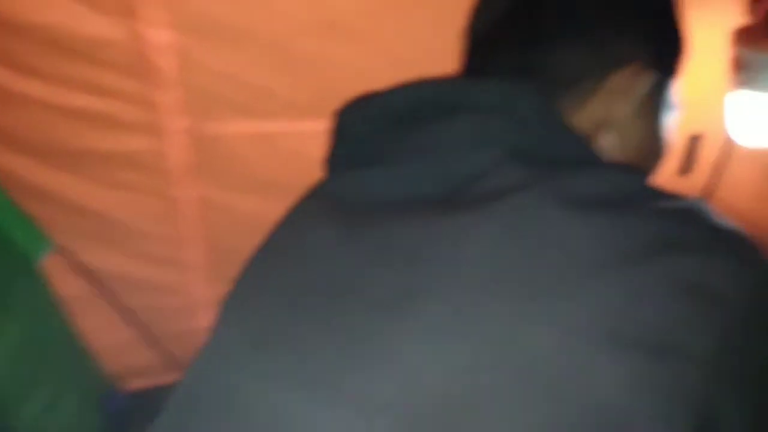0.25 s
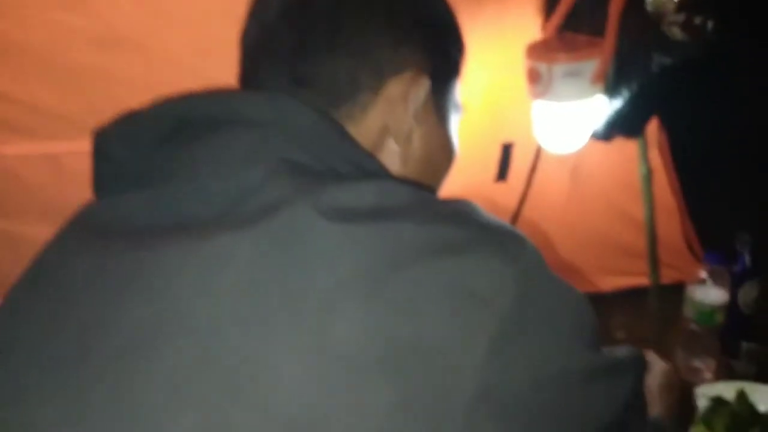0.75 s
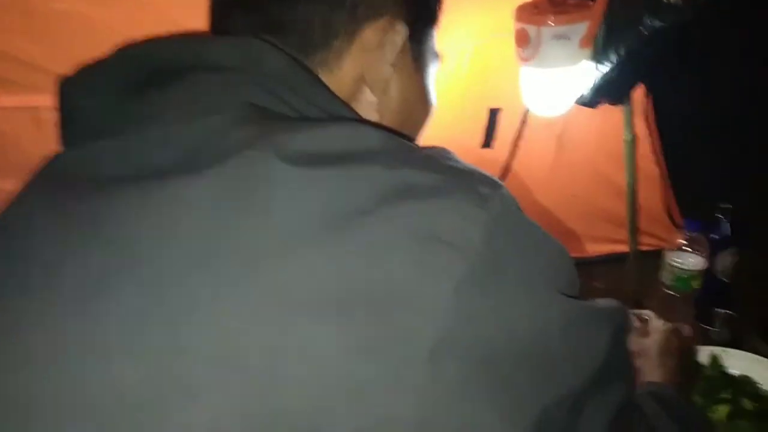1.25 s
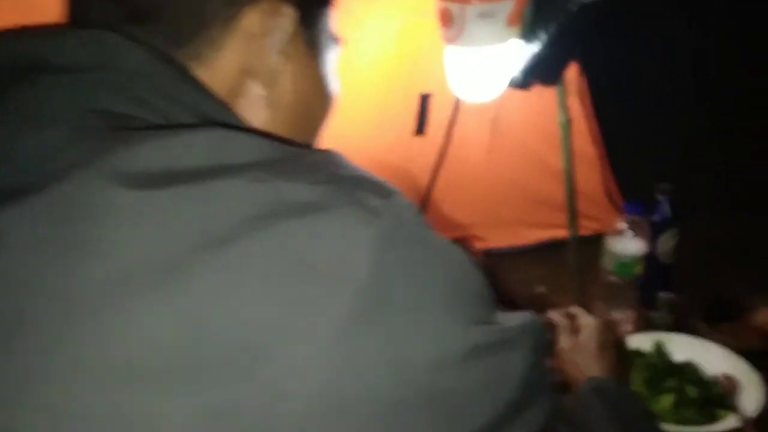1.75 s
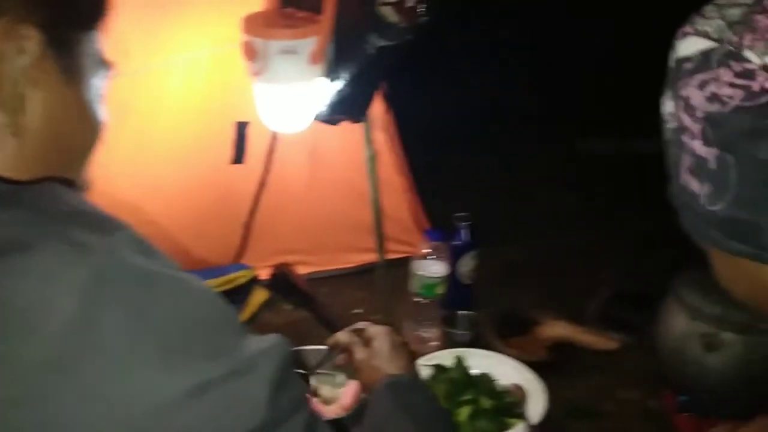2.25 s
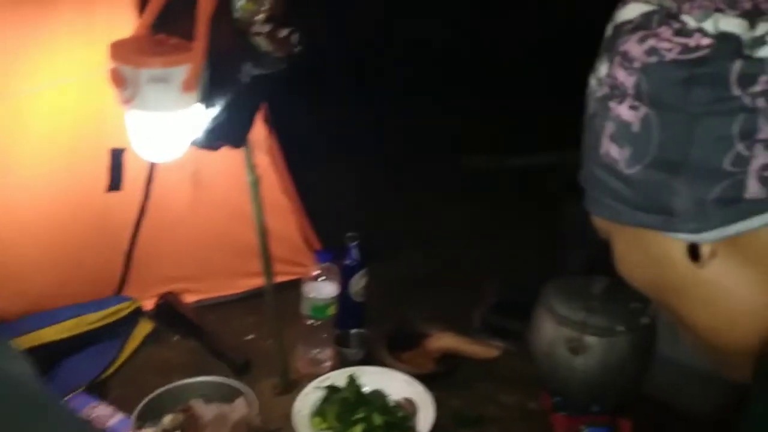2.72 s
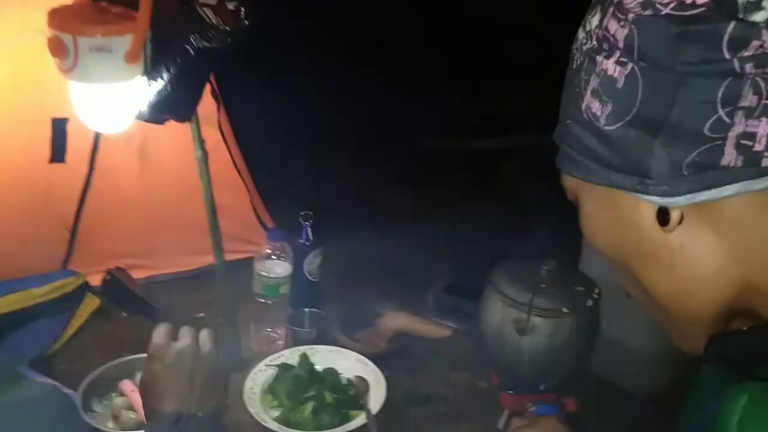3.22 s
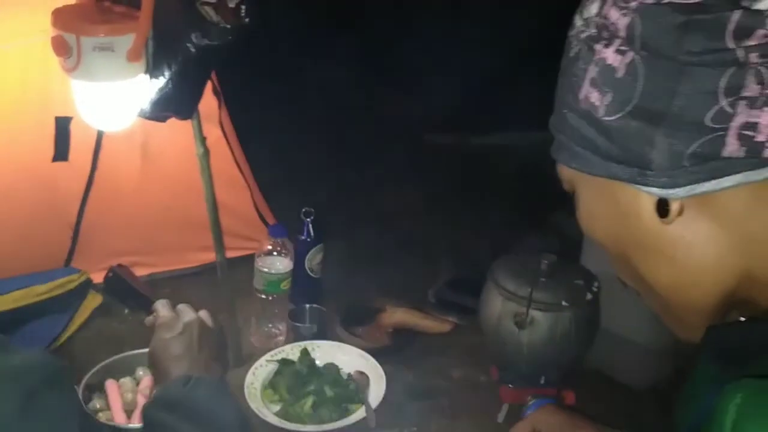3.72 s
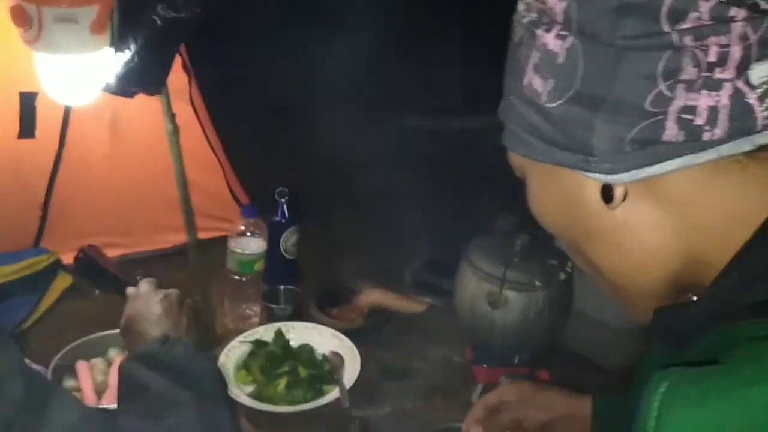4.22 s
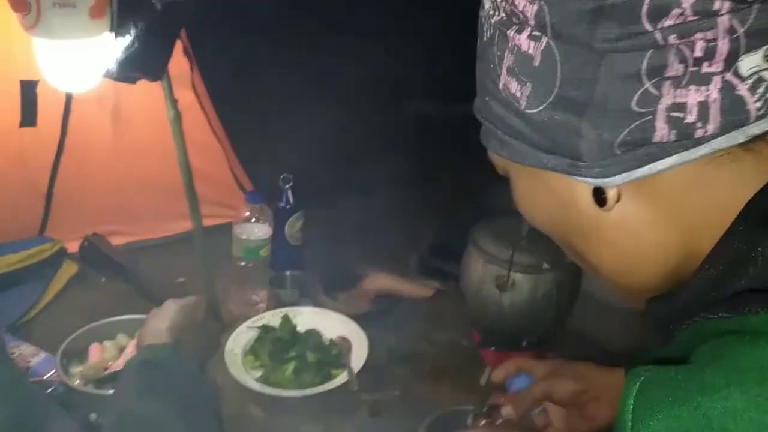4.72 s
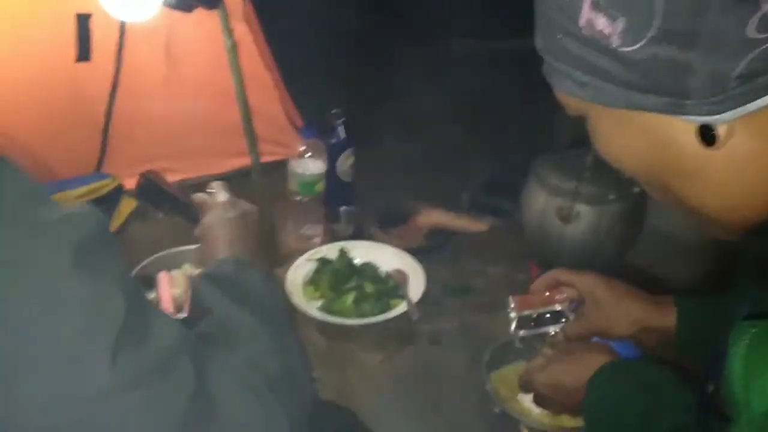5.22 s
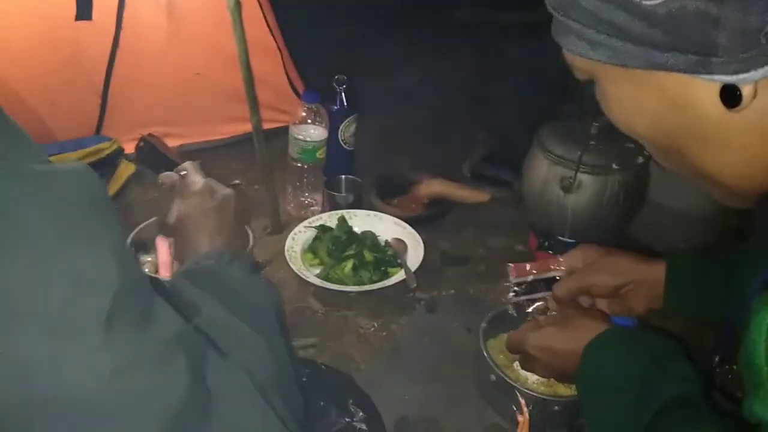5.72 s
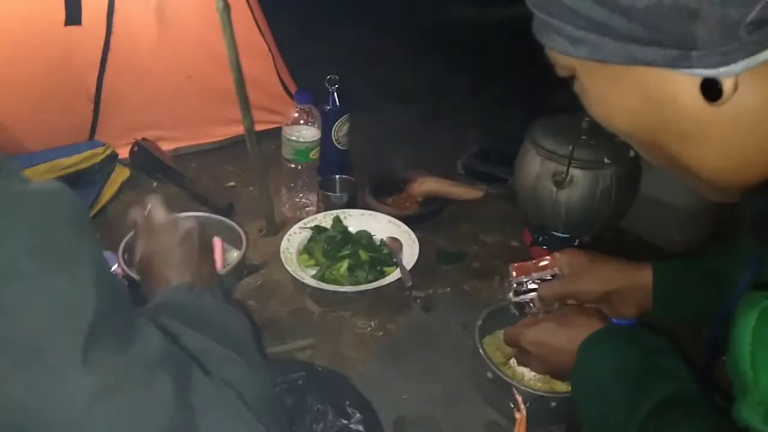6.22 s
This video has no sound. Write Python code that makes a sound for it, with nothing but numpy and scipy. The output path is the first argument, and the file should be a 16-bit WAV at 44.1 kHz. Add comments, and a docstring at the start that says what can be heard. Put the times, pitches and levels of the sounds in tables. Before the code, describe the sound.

A gas burner hisses softly and steadily at a quiet outdoor camp, with a low flame murmur underneath. Close by, jacket sleeves rustle and a sachet crinkles with small sharp crackles throughout, easing a little after about 4.5 seconds. A spoon clicks and scrapes in a filled metal bowl right at the start and again around 0.7 seconds. It gives a sharp clink with a hollow knock at 1.4, lighter taps and a scrape around 2, a strong clink among scrapes near 2.8, and a briefly ringing one at 3.3. Short, slightly squeaky scrapes follow from 4 to 4.3 seconds. A few dull bumps sound on the ground from about 4.3, and a tin is knocked once at 5.3. After a faint scrape near 5.9, three quick spoon clinks come at about 6.3 seconds. Everything sounds near and fairly dry.

```python
"""A spoon clicks, scrapes and digs in a metal bowl at a quiet camp, beside a hissing gas burner.
Impacts and stick-slip friction excite the bowl's modes and its hollow; the turbulent gas jet hisses
and the flame murmurs under a pot. Jacket sleeves and a sachet crinkle as they buckle. Late on, a few
dull bumps sound on the ground and a tin is knocked once. Ground, pot and tent return close echoes
of the spoon and the crinkling to a microphone with two ports."""
import sys
import numpy as np
from scipy import signal
from scipy.fft import rfft, irfft, next_fast_len
from scipy.io import wavfile
from scipy.ndimage import uniform_filter1d, map_coordinates

SR = 44100
rng = np.random.default_rng(int(sys.argv[2]) if len(sys.argv) > 2 else 0)


def wav_out(sig):
    """Save sig, one row per channel (or a flat mono array), as 16-bit PCM at SR to the path in sys.argv[1]."""
    wavfile.write(sys.argv[1], SR, np.round(np.clip(np.atleast_2d(sig).T, -1, 1) * 32767).astype(np.int16))


N = 285327
T = np.arange(N) / SR

# All levels in the tables are relative.
# burner hiss and low flame murmur, with a gap near 1.3-2.5 kHz from the recorder's processing:
# f/Hz, level/dB
HISS_SPECTRUM = [(900, -14.5), (1300, -21), (1650, -30), (2150, -24), (2750, -4.5), (3200, -9.5),
                 (3900, 2.5), (4400, -2), (6000, 0), (8000, -1.5), (9500, 0), (12000, -6.5), (15500, -8)]
MURMUR_SPECTRUM = [(20, -27), (45, -18), (70, -6.5), (110, 1.5), (160, 1.5), (210, -1.5), (280, -9),
                   (450, -11), (800, -13), (1100, -14), (1350, -25), (1650, -39), (4000, -26)]
# rumble of moving air: f/Hz, level/dB
AIR_SPECTRUM = [(20, -10), (45, -7.5), (70, -3), (100, -14), (180, -27), (600, -24.5)]
# resonances of the burner head: f/Hz, bandwidth/Hz, level/dB
BURNER_RESONANCES = [(3570, 130, 12), (3930, 110, 12)]
# strength of the flame: t/s, level/dB
FLAME_LEVELS = [(0, -45.5), (2, -44.5), (3.5, -45.5), (5.5, -45), (6.0, -44.5), (6.47, -43.5)]
# movement of sleeves and sachet: t/s, fine rustle level/dB, heavy fold level/dB
RUSTLE_LEVELS = [(0, -36, -51), (.27, -30.5, -46.5), (.37, -24, -48), (.5, -28.5, -48), (.77, -24.5, -45),
                 (1.15, -31, -51), (1.33, -28, -45.5), (1.53, -22.5, -38), (1.65, -26.5, -43),
                 (1.88, -30, -55), (2.06, -24.5, -39), (2.27, -30, -50.5), (2.62, -25.5, -46),
                 (2.8, -25.5, -45.5), (3.03, -30.5, -58), (3.2, -27.5, -47.5), (3.45, -25, -42.5),
                 (3.88, -27.5, -45.5), (4.38, -24.5, -43), (4.5, -28.5, -57), (4.85, -30, -53),
                 (5.1, -34, -63), (5.3, -32.5, -51), (5.78, -32.5, -61), (5.96, -29.5, -57),
                 (6.21, -29.5, -55), (6.47, -30, -44)]
# spectra of the fine rustle and the heavy folds: f/Hz, level/dB
FABRIC_SPECTRUM = [(300, -41), (1600, -18.5), (2200, -12.5), (3200, -4), (4800, -3), (7000, -1.5),
                   (9000, 0), (10500, -3.5), (12500, -8), (15500, -10.5)]
FOLD_SPECTRUM = [(150, -62), (450, -5), (700, -5.5), (1050, 0.5), (1500, -4.5), (2600, -1), (4500, -32),
                 (9000, -35)]
# spoon impacts: t/s, tick level/dB, tick f/Hz, ring level/dB, knock level/dB, knock f/Hz, tick t60/s
SPOON_IMPACTS = [(.072, -17.5, 7400, -31, -32.5, 1060, .056), (.642, -17.5, 3900, -25.5, -34, 1050, .03),
                 (.686, -29, 3600, -39, -33.5, 990, .045), (.874, -25, 3400, -37, -27, 980, .035),
                 (0.995, -34, 5000, -39, -36.5, 1100, .06), (1.356, -7, 5000, -28, -21.5, 1130, .056),
                 (1.389, -16.5, 7000, -44, -39, 1040, .05), (1.393, -27, 1600, -47, -26, 1100, .04),
                 (1.620, -36, 5000, -50, -31.5, 900, .045), (1.940, -17, 11000, -38, -43, 864, .05),
                 (1.9445, -22, 2600, -34, -22.5, 860, .032), (2.016, -25, 3900, -40, -37, 1000, .035),
                 (2.073, -21, 3900, -37, -28.5, 920, .045), (2.175, -25, 5800, -44, -37, 900, .035),
                 (2.661, -26, 3600, -38, -29, 1180, .045), (2.761, -4, 5400, -29, -27, 1850, .016),
                 (2.7655, -10, 9000, -30, -27, 1250, .03), (2.905, -29, 7000, -51, -35, 1250, .06),
                 (2.916, -24, 9000, -51, -33.5, 1000, .06), (2.926, -26, 6500, -51, -35, 1250, .05),
                 (3.2532, -10.5, 8000, -17.5, -27, 1120, .056), (6.237, -10, 4400, -30, -26, 1360, .05),
                 (6.2725, -17.5, 7000, -34, -35, 1370, .056), (6.3005, -9.5, 5200, -28, -25.5, 1020, .06)]
# modes of the filled bowl: f/Hz, level/dB, t60/s
BOWL_MODES = [(1160, -3, 0.054), (1410, -8, 0.057), (1830, -3.5, 0.06), (2313, -6, 0.07), (2690, -2, 0.084),
              (2952, 2, 0.11), (3060, 1, 0.09), (3416, 2, 0.056), (3860, 3, 0.14), (3990, -1, .1),
              (4630, -4, 0.06), (5300, -3, 0.06), (6680, 1, 0.08), (7560, 3, 0.09), (8760, 1, .064),
              (11130, 3, 0.065)]
# spectrum of the contact between spoon and bowl: f/Hz, level/dB
CONTACT_SPECTRUM = [(300, -41), (1500, -16), (3000, -2.5), (5000, -1), (7500, 1), (9000, 2), (11000, -1),
                    (12500, -7.5), (15500, -17)]
# spoon strokes: t/s, length/s, rasp level/dB, bowl level/dB, squeak level/dB, squeak f/Hz, hollow f/Hz
SPOON_STROKES = [(0.073, 0.095, -25.5, -41.5, -32, 3200, 1080), (0.691, 0.084, -22.5, -44, -27, 7100, 1010),
                 (1.366, 0.042, -33, -43, -32, 5200, 1110), (1.549, 0.028, -23, -38, -29, 3300, 1150),
                 (1.954, .13, -27.5, -40, -37, 3530, 980), (2.664, 0.06, -24, -32, -24, 3830, 1200),
                 (2.706, 0.052, -25, -32.5, -36, 1830, 1240), (2.849, 0.045, -28, -38, -37, 1850, 1850),
                 (2.894, 0.045, -28.5, -42, -40, 5030, 1200), (3.256, 0.052, -29, -36, -29, 3890, 1130),
                 (3.993, 0.1, -27, -39, -39, 6650, 1140), (4.07, 0.089, -19.5, -39.5, -24, 4660, 1370),
                 (4.201, 0.06, -24, -38.5, -27.5, 3620, 1550), (4.245, 0.034, -29, -50, -27, 4560, 1430),
                 (5.868, 0.08, -33, -56, -32, 5600, 1000), (6.272, 0.062, -27.5, -36.5, -34, 6920, 1900)]
# sharp crackles: creases giving way, and the start of a spoon scrape at 2.67 s: t/s, level/dB
SHARP_CRACKLES = [(.0945, -5), (0.247, -16), (.339, -14.5), (.419, -14), (0.617, -12.5), (.698, -12.5),
                  (.734, -9), (.771, -10), (.787, -13), (.831, -14), (.954, -14), (0.9773, -10),
                  (1.1623, -11.5), (1.367, -11), (1.686, -13), (1.816, -11.5), (1.9728, -8), (2.0303, -8),
                  (2.0537, -5.5), (2.1138, -4.5), (2.143, -9), (2.2114, -12.5), (2.2706, -10),
                  (2.4164, -10), (2.437, -12), (2.4853, -8), (2.531, -11), (2.673, -9), (2.683, -10),
                  (2.839, -13), (2.866, -12), (2.909, -11.5), (2.998, -11), (3.0676, -11.5), (3.115, -13),
                  (3.38, -12), (3.413, -10.5), (3.497, -9.5), (3.528, -8.5), (3.551, -8.5), (3.565, -12),
                  (3.691, -9.5), (3.72, -14), (3.9804, -11), (4.168, -11), (4.2515, -10), (4.401, -10.5),
                  (4.644, -9), (4.7543, -11), (5.2734, -18), (5.4118, -10.5), (5.453, -18.5), (5.523, -16),
                  (5.5294, -10), (5.548, -16), (5.595, -15.5), (5.839, -16), (6.047, -14.5), (6.1263, -8),
                  (6.2905, -9.5)]
# spectra of a sharp snap and its lower crackle: f/Hz, level/dB
SNAP_SPECTRUM = [(500, -22.5), (3000, -12), (6000, -7), (8500, 6), (10500, 3), (12500, -9), (15500, -6)]
CRACKLE_SPECTRUM = [(300, -36), (1800, -8), (3300, -0.5), (5500, 4), (8000, -6), (15000, -46)]
# bumps on the ground: t/s, level/dB, f/Hz, length/s
GROUND_BUMPS = [(4.342, -26, 93, 0.053), (4.402, -28, 86, 0.047), (4.838, -37, 170, 0.022),
                (5.347, -30, 350, 0.012), (6.291, -36, 286, 0.012)]
# modes of the tin, damped by the ground: f/Hz, level/dB, t60/s
TIN_MODES = [(226, -7.5, 0.15), (510, -13, 0.058), (826, -3.5, 0.05), (950, -2, 0.044), (1290, -16, 0.035),
             (1825, -4, 0.048), (2230, -12, 0.05), (2400, -8, 0.048), (2625, -1.5, 0.04), (2695, -1, .045),
             (3540, -4, 0.04), (3700, -6, .035), (4500, -7, .035), (5040, -8, .055), (5600, -11, .05),
             (6720, -6, 0.04)]
# spectrum of the tin's thud against the ground: f/Hz, level/dB
THUD_SPECTRUM = [(120, -20), (220, 1), (400, -3), (650, -10), (900, 3), (1300, -13), (2500, -6),
                 (6000, -22)]
# response of the right port, which faces away from the bowl: f/Hz, level/dB
RIGHT_PORT_RESPONSE = [(30, -6.5), (70, 2), (130, -1), (1100, 1), (2000, -2.5), (3500, -6), (5000, -7.5),
                       (7000, -4.5), (9000, -2.5), (11500, 2), (15500, 1)]


def undb(db):
    """Amplitude grows tenfold for every 20 dB."""
    return 10 ** (np.asarray(db) / 20)


def unit(x):
    """Normalisation to an rms of 1."""
    return x / np.sqrt(np.mean(x ** 2))


def gains(points, n):
    """Frequency response at the bins of an n-point spectrum, interpolated in dB over log frequency."""
    hz, db = np.transpose(points)
    bin_hz = np.arange(n // 2 + 1) * SR / n
    return undb(np.interp(np.log(bin_hz + 1), np.log(hz), db))


def colour(x, points):
    """Spectral shaping that conserves the power of white noise."""
    n = next_fast_len(x.shape[-1])
    return irfft(rfft(x, n) * unit(gains(points, n)), n)[..., :x.shape[-1]]


def resonate(x, hz, width_hz):
    """A second-order resonance with gain 1 at its centre."""
    return signal.lfilter(*signal.iirpeak(min(hz, .45 * SR), hz / width_hz, SR), x)


def wander(rate):
    """Smooth random modulation of rms 1, from `rate` new values a second."""
    hold = max(int(SR / rate), 1)
    steps = np.repeat(rng.standard_normal(N // hold + 1), hold)
    return unit(uniform_filter1d(uniform_filter1d(steps, hold), hold)[:N])


def add(out, start_s, sound):
    """Superposition: a sound joins the mix at its starting time."""
    i = max(int(start_s * SR), 0)
    out[:, i:i + sound.shape[1]] += sound[:, :N - i]


def stove(jet_db, whistle_db, side_db, air_db):
    """Turbulence is broadband: the jet hisses and excites the burner head; flame and air rumble."""
    gas = rng.standard_normal((2, N))
    whistle = sum(undb(db + whistle_db + 1.4 * wander(5.23)) * resonate(gas, hz, width)
                  for hz, width, db in BURNER_RESONANCES)
    hiss = colour(rng.standard_normal((2, N)), HISS_SPECTRUM)
    jet = (hiss + whistle) * undb(jet_db + 1.3 * wander(6.6))
    flame = colour(rng.standard_normal(N) + undb(side_db) * rng.standard_normal((2, N)), MURMUR_SPECTRUM)
    air = colour(rng.standard_normal((2, N)), AIR_SPECTRUM) * undb(air_db + 2.2 * wander(4.5))
    flame_db = np.interp(T, *np.transpose(FLAME_LEVELS)) + 1.63 * wander(11)
    return jet + flame * undb(flame_db) + air


def grains(per_s, spread_db, life_s):
    """Shot noise: random slips of unequal size, each a puff whose power decays exponentially."""
    sizes = undb(spread_db * np.minimum(rng.exponential(size=N), 4))
    slips = sizes * (rng.random(N) < per_s / SR)
    power = signal.lfilter([1], [1, -np.exp(-1 / (life_s * SR))], slips ** 2)
    return unit(np.sqrt(power) * rng.standard_normal((2, N)))


def rustle(fabric_db, folds_db, left_db):
    """Friction in fabric and foil releases many tiny slips: fine rustle, sharp prickles, heavy folds."""
    times, *levels = np.transpose(RUSTLE_LEVELS)
    fine_db, heavy_db = (np.interp(T, times, level) for level in levels)
    sides_db = np.array([[1], [-1]]) * left_db / 2
    prickles = undb(-6) * grains(per_s=45, spread_db=2.5, life_s=.0005)
    fine = colour(grains(per_s=1300, spread_db=2.5, life_s=.0016) + prickles, FABRIC_SPECTRUM)
    fine *= undb(fine_db + fabric_db + sides_db + 1.55 * wander(40))
    folds = colour(grains(per_s=370, spread_db=2.5, life_s=.0059), FOLD_SPECTRUM)
    folds *= undb(heavy_db + folds_db + 2.8 * wander(30))
    return fine + folds + .44 * folds[::-1]  # each fold reaches both ports


def burst(t60, rise_s):
    """Scattering spreads an impact into noise that swells and decays, independently at each port."""
    t = T[:SR // 4]
    envelope = (1 - np.exp(-(t / rise_s) ** 2)) * np.exp(-np.log(1000) * t / t60)
    return envelope / envelope.max() * rng.standard_normal((2, len(t)))


def ring(modes, scatter_db, detune, diffuse_hz):
    """Free vibration is a sum of damped modes; each contact point shares the energy out anew."""
    t, out = T[:SR // 4], 0
    weights = unit(undb(scatter_db * rng.standard_normal(len(modes))))
    for (hz, db, t60), weight in zip(modes, weights):
        pitch, lag = rng.uniform(-1.1, 1, 2)
        # high modes reach the two ports out of step
        phase = np.array([[1], [-1]]) * lag * min(hz / diffuse_hz, np.pi / 2)
        envelope = weight * undb(db) * np.exp(-np.log(1000) * t / t60)
        out = out + envelope * np.sin(2 * np.pi * hz * (1 + detune * pitch) * t + phase)
    return out * (1 - np.exp(-t / .00056))


def hollow_knock(hz, t60, thud_db):
    """Cavity resonance: the struck bowl gives a pitched pock over a thud an octave lower; peak 1."""
    pock = resonate(resonate(burst(t60, rise_s=.0006), hz, 380), hz, 640)
    thud = resonate(resonate(burst(.38 * t60, rise_s=.0008), hz / 2, 520), hz / 2, 900)
    knock = unit(pock) + undb(thud_db) * unit(thud)
    knock = knock + .15 * knock[::-1]
    return knock / np.abs(knock).max()


def spoon_clinks(tick_db, focus_db, ring_db, knock_db):
    """Impact excitation: the spoon ticks on the rim and sets the bowl's wall and hollow ringing."""
    ticks, body = np.zeros((2, 2, N))
    for start, db, tick_hz, metal_db, hollow_db, hollow_hz, t60 in SPOON_IMPACTS:
        tick = undb(db) * burst(t60, rise_s=.0005)
        add(ticks, start, tick + undb(focus_db) * resonate(tick, tick_hz, 1360))
        metal = ring(BOWL_MODES, scatter_db=2.2, detune=.008, diffuse_hz=2520)
        add(body, start, undb(metal_db + ring_db) * metal)
        knock = hollow_knock(hollow_hz, .65 * t60, thud_db=-13)
        add(body, start - .0005, undb(hollow_db + knock_db) * knock)
    return undb(tick_db) * colour(ticks, CONTACT_SPECTRUM) + body


def glide(x, share):
    """Time warping slides the pitch up or down by a share over the length of a sound."""
    i = np.arange(x.shape[1])
    place = i + share * rng.choice([-1, 1]) * i * (i / len(i) - 1) / 2
    return np.array([map_coordinates(port, [place], mode="mirror") for port in x])


def spoon_scrapes(rasp_db, ring_db, squeak_db, hollow_db):
    """Stick-slip friction rasps and drives the bowl and its hollow; a squeak slides with the grip."""
    out = np.zeros((2, N))
    slips = grains(per_s=700, spread_db=1, life_s=.0019)
    slips *= undb(1.8 * wander(260))  # the edge catches and lets go
    damped_modes = [(hz, db, .45 * t60) for hz, db, t60 in BOWL_MODES]  # the spoon presses on the wall
    for start, length, db, bowl_db, grip_db, grip_hz, hollow_hz in SPOON_STROKES:
        drag = unit(slips[:, int(start * SR):int((start + length) * SR)])
        stroke = signal.windows.tukey(drag.shape[1], .45)
        bowl_response = ring(damped_modes, scatter_db=1.5, detune=.022, diffuse_hz=1500)
        metal = signal.fftconvolve(drag, bowl_response, axes=1)[:, :len(stroke)]
        squeak = glide(resonate(resonate(drag, grip_hz, 280), grip_hz, 1200), share=.025)
        hollow = resonate(resonate(drag + .46 * drag[::-1], hollow_hz, 310), hollow_hz, 630)
        wall_echo = .5 * np.roll(drag, int(.0009 * rng.uniform(.5, 1) * SR), axis=1)
        rasp = colour(drag + wall_echo, CONTACT_SPECTRUM)
        parts = [(rasp, db + rasp_db), (metal, bowl_db + ring_db),
                 (squeak, grip_db + squeak_db), (hollow, bowl_db + hollow_db)]
        add(out, start, stroke * sum(undb(part_db) * unit(part) for part, part_db in parts))
    return out


def faint_creases(per_s, offset_db, spread_db):
    """Small creases buckle at random times, as strongly as the hands move; rows of t/s, level/dB."""
    when, size = rng.random((200, 2))[:int(per_s * T[-1])].T
    rustle_times, fine_db, _ = np.transpose(RUSTLE_LEVELS)
    times = when * T[-1]
    levels = np.interp(times, rustle_times, fine_db) + offset_db + spread_db * (2 * size - 1)
    return list(zip(times, levels))


def crackles(snap_db, crackle_db, left_db):
    """Buckling creases, and once the start of a scrape, give a tick and tiny snaps over a crackle."""
    high, low = np.zeros((2, 2, N))
    tail_t60 = .083
    for start, db in list(SHARP_CRACKLES) + faint_creases(per_s=6, offset_db=5.5, spread_db=2.5):
        tick = burst(t60=.014, rise_s=.0003)
        tail = undb(-6.5) * burst(tail_t60, rise_s=.00087)
        add(high, start - .0005, undb(db) * (tick + tail))
        add(low, start - .001, undb(db) * burst(tail_t60, rise_s=.0033))
    flicker = undb(1.2 * wander(700) + np.array([[1], [-1]]) * left_db / 2)
    snaps = undb(snap_db) * colour(high * flicker, SNAP_SPECTRUM)
    return snaps + undb(crackle_db) * colour(low * flicker, CRACKLE_SPECTRUM)


def ground_bumps():
    """Soft, heavy pushes give low pulses of a few cycles, stronger and leading in phase on the right."""
    out = np.zeros((2, N))
    port_db, port_phase = np.array([[-6], [2.5]]), np.array([[0], [1.5]])
    for start, db, hz, length in GROUND_BUMPS:
        t = T[:int(length * SR)]
        envelope = undb(db + port_db) * np.sin(np.pi * t / length)
        add(out, start, envelope * np.sin(2 * np.pi * hz * t + port_phase))
    return out


def tin_knock(start_s, ring_db, clack_db, thud_db):
    """Damped modal vibration: a knocked tin clacks and thuds, and its base hums a moment longer."""
    out = np.zeros((2, N))
    add(out, start_s, undb(ring_db) * ring(TIN_MODES, scatter_db=.8, detune=.006, diffuse_hz=1500))
    add(out, start_s - .001, undb(clack_db) * colour(burst(t60=.064, rise_s=.0012), CRACKLE_SPECTRUM))
    add(out, start_s, undb(thud_db) * colour(burst(t60=.06, rise_s=.002), THUD_SPECTRUM))
    # so small a body radiates no deep bass
    return signal.sosfilt(signal.butter(3, 150, "high", fs=SR, output="sos"), out)


def reflections(x, echo_db, count):
    """Comb filtering: close echoes join the direct sound, drifting as hands and microphone move."""
    out = x.copy()
    for port in (0, 1):
        for _ in range(count):
            lag_s = rng.uniform(.001002, .006) + .000184 * wander(1.5)
            out[port] += undb(echo_db) * np.interp(T - lag_s, T, x[port])
    return out / np.sqrt(1 + count * undb(echo_db) ** 2)


def scene():
    """The sources add linearly; only the spoon and the crinkling carry echoes."""
    spoon = spoon_clinks(tick_db=-3.5, focus_db=5.5, ring_db=-2.5, knock_db=8.5)
    spoon += spoon_scrapes(rasp_db=2.5, ring_db=4.5, squeak_db=1, hollow_db=-3.5)
    burner = stove(jet_db=-35.5, whistle_db=-1, side_db=-11.5, air_db=-59)
    knocks = ground_bumps() + tin_knock(start_s=5.296, ring_db=-8.5, clack_db=-8, thud_db=-19)
    crinkling = rustle(fabric_db=-2.5, folds_db=-.2, left_db=.5)
    crinkling += crackles(snap_db=-6.5, crackle_db=-21, left_db=1)
    return reflections(spoon + crinkling, echo_db=-9.5, count=3) + burner + knocks


def record(dry):
    """The right port is shadowed and both resonate in the treble; saturation and a low-pass follow."""
    n = next_fast_len(N)
    left = dry[0]
    right = irfft(rfft(dry[1], n) * gains(RIGHT_PORT_RESPONSE, n), n)[:N]
    ports = np.array([left + 2.29 * resonate(left, 9360, 980),
                      right + 1.86 * resonate(right, 9580, 810)])
    low_pass = signal.ellip(10, .2, 70, 15850, fs=SR, output="sos")
    return signal.sosfilt(low_pass, np.tanh(ports))


dry = scene()
out = record(dry)
wav_out(out)
```